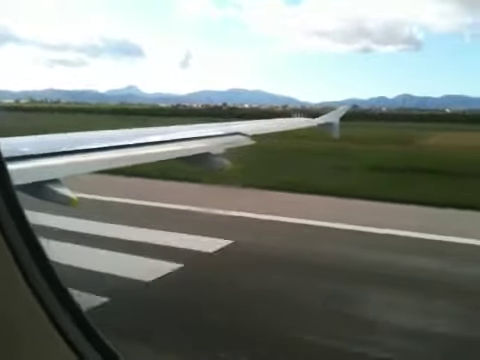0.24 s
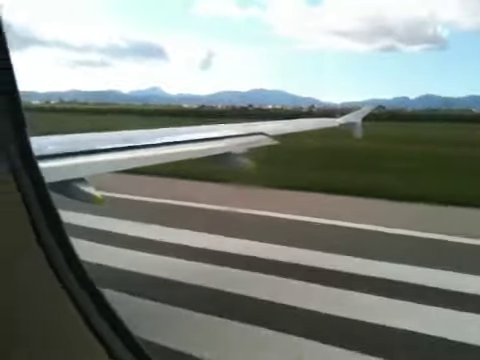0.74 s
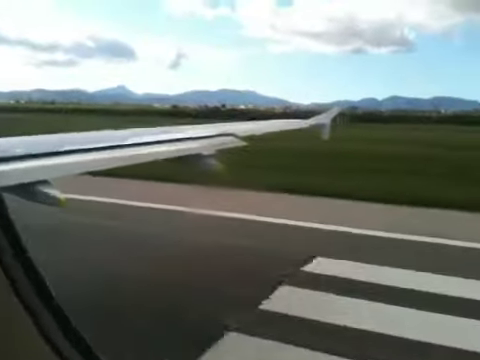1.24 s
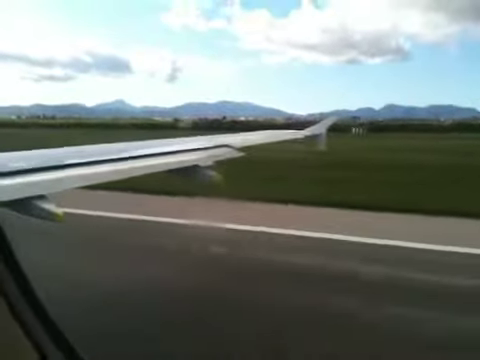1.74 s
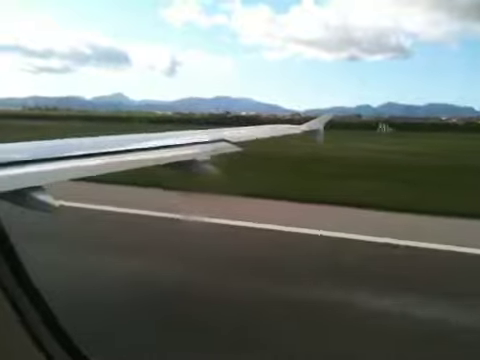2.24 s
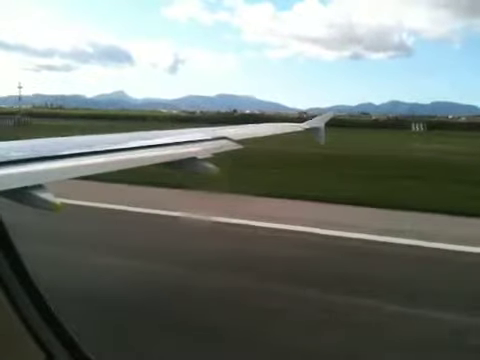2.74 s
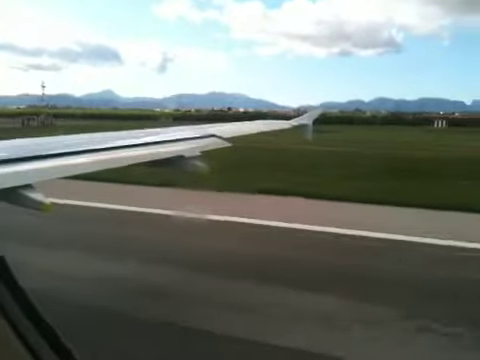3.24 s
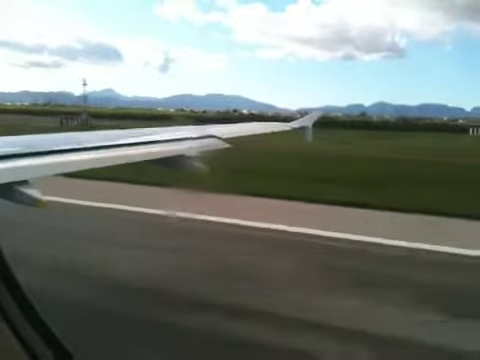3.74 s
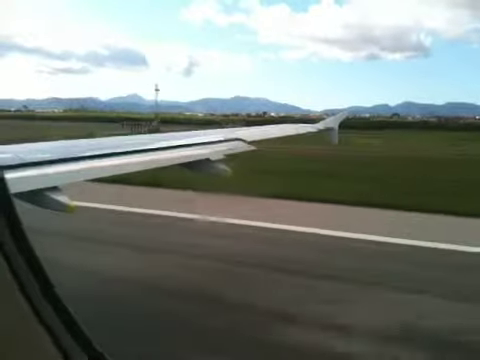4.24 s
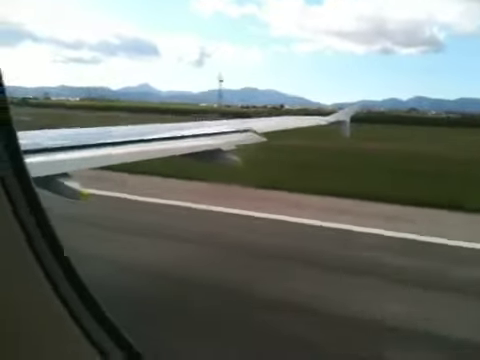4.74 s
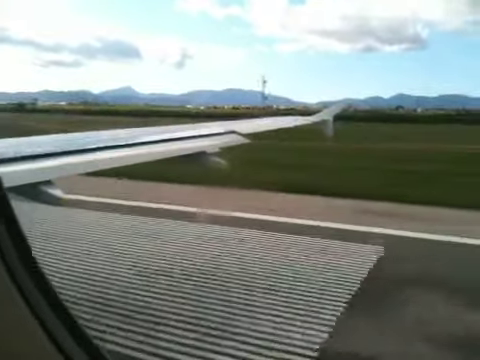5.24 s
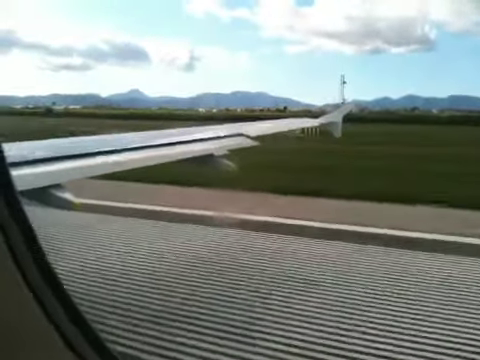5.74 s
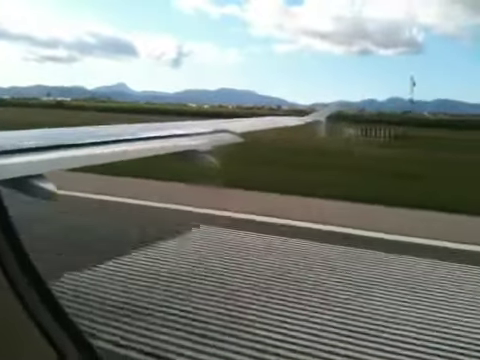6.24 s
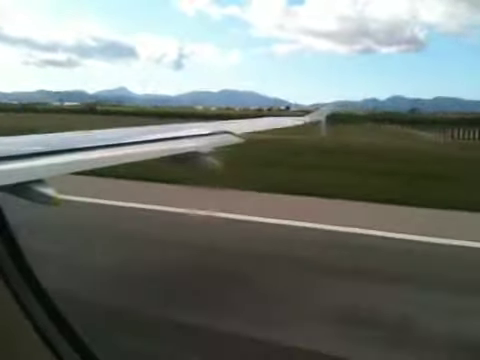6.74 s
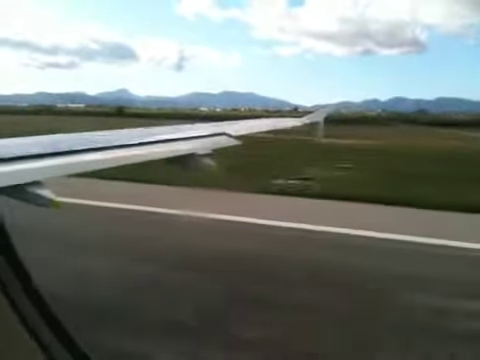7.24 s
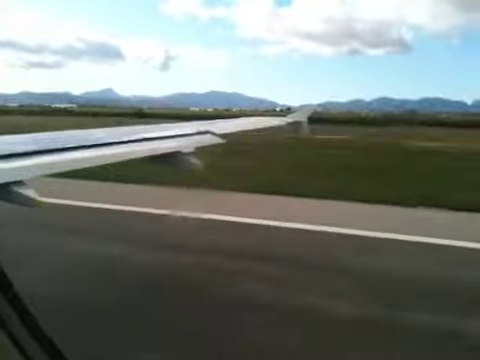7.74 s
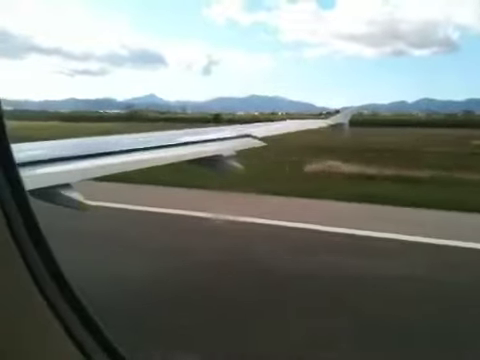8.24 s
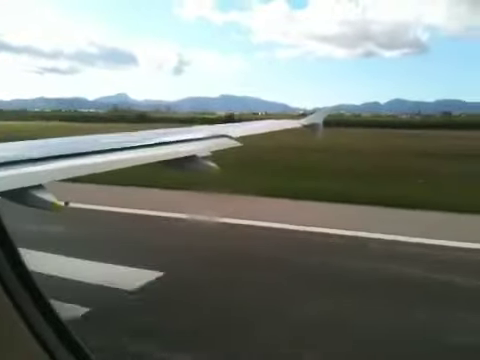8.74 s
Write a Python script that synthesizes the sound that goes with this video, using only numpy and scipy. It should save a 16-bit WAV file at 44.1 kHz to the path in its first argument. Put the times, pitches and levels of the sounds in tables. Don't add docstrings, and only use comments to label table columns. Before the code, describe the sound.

Inside an airliner rolling fast along a runway, booming engine roar, hissing vents, buzzing plastic panels, hard rattling knocks and floor thumps.

```python
import sys
import numpy as np
from scipy import signal
from scipy.fft import rfft, irfft
from scipy.io import wavfile
from scipy.ndimage import uniform_filter1d

SR = 44100
rng = np.random.default_rng(int(sys.argv[2]) if len(sys.argv) > 2 else 0)


def makeup_ratio(level_db):
    decades = np.asarray(level_db, float) / 20
    return 10 ** decades


def waveform_to_disk(signal):
    frames = np.transpose(np.atleast_2d(signal))
    scaled = np.clip(frames, -1, 1) * 32767
    samples = np.round(scaled).astype(np.int16)
    wavfile.write(sys.argv[1], SR, samples)


N = 396459

# time in seconds, rise in dB.
JOLTS = [(.0, 27), (.22, -12), (.55, 5), (.75, 4), (.87, 13), (.93, -1), (1.4, 6), (1.52, -2), (2.13, 10),
         (2.23, 15), (2.56, 4), (2.75, 9.5), (3.03, 7), (3.27, 13), (3.52, 8), (3.82, 3), (4.3, 3),
         (4.62, 2), (4.78, 11), (5.01, 2), (5.2, -8), (5.56, -3), (6.4, 0), (7.08, 3), (7.28, 16),
         (7.96, 11), (8.34, 8), (8.64, 8), (8.84, 8)]
JOLT_S = 0.025


def evened(x):
    return x / np.sqrt(np.mean(x ** 2) + 1e-20)


def smooth_twice(x, size):
    return uniform_filter1d(uniform_filter1d(x, size=size), size=size)


def curve(rows):
    s, db = np.transpose(rows)
    return np.interp(np.arange(N) / SR, s, db)


def swell(rows, width_s, late_s=0):
    t = np.arange(0, N + 64, 64) / SR
    s, db = np.transpose(rows)
    bells = db @ np.exp(-((t - s[:, None] - late_s) / width_s) ** 2)
    return np.interp(np.arange(N) / SR, t, bells)


def resonate(x, hz, width):
    r = np.exp(-np.pi * width / SR)
    return 2 * signal.lfilter([1 - r], [1, -r * np.exp(2j * np.pi * hz / SR)], x).real


def swings(rows, t60, rise_s):
    t, out = np.arange(2400) / SR, np.zeros(N + 2400)
    for s, db, hz in rows:
        envelope = makeup_ratio(db - 60 * t / t60) * (1 - np.exp(-t / rise_s))
        start = round(s * SR)
        out[start:start + len(t)] += envelope * np.sin(2 * np.pi * hz * t)
    return out[:N]


def swishes(rows, width):
    t, noise, out = np.arange(N) / SR, rng.standard_normal(N), 0
    for s, length, db, hz in rows:
        swish = evened(resonate(resonate(noise, hz, width), hz, width))
        out = out + makeup_ratio(db) * np.exp(-(2 * (t - s) / length) ** 2) * swish
    return out


def turbulence(points, size, patchy_db, flicker_db):
    hop = size // 4
    hz = np.fft.rfftfreq(size, 1 / SR)
    a, b, patches = rng.standard_normal((3, len(hz), N // hop + 8))
    patches = uniform_filter1d(patches, size=8, axis=0)
    patches = evened(uniform_filter1d(patches, size=10, axis=1))
    flicker = evened(uniform_filter1d(rng.standard_normal(a.shape[1]), size=3))
    f, db = np.transpose(points)
    colour_db = np.interp(np.log(hz + 1), np.log(f + 1), db, right=-150)[:, None]
    z = (a + 1j * b) * makeup_ratio(colour_db + patchy_db * patches + flicker_db * flicker)
    return evened(signal.istft(z, nperseg=size, noverlap=size - hop)[1][size:N + size])


def whine(waver_hz=2.):
    # pitch in Hz, level in dB.
    overtones = [(11946, -79.5), (12743, -75), (13540, -85), (15030, -91), (15133, -90)]
    waver = evened(uniform_filter1d(rng.standard_normal(N), size=6000)) * waver_hz / 12000
    t = np.cumsum(1 + waver) / SR
    tones = 0
    for hz, db in overtones:
        tones = tones + np.sqrt(2) * makeup_ratio(db) * np.sin(2 * np.pi * (hz * t + rng.random()))
    return tones


def vent(hz=2250, width=550, level_db=-50, swell_db=1.5):
    noise, drift = rng.standard_normal((2, N))
    drift = evened(smooth_twice(drift, 4000))
    breath = evened(resonate(resonate(noise, hz, width), hz, width))
    return makeup_ratio(level_db + swell_db * drift) * breath


def air(start_db=-31.5, sag_db_per_s=-0.1843, per_jolt=0.14):
    # pitch in Hz, level in dB per Hz.
    hiss = [(410, -21.5), (700, 0), (1130, -8), (1310, -7), (1430, -11), (1880, -14), (2220, -13.5),
            (2500, -19), (3030, -19.5), (3880, -20.5), (4250, -23.5), (7630, -26.5), (10400, -33),
            (13200, -40), (15600, -53)]
    level_db = start_db + sag_db_per_s * np.arange(N) / SR + per_jolt * swell(JOLTS, JOLT_S)
    return makeup_ratio(level_db) * turbulence(hiss, size=512, patchy_db=0.7, flicker_db=0.79)


def cloth():
    # centre in seconds, length in seconds, level in dB, pitch in Hz.
    brushes = [(4.275, 0.15, -50, 9900), (4.6, 0.12, -48, 8000), (5.68, 0.072, -46, 8160),
               (6.9, .03, -62, 12500), (4.26, .14, -62, 11500), (4.35, .12, -59, 9000),
               (4.95, .1, -60, 10000)]
    # centre in seconds, length in seconds, level in dB, pitch in Hz.
    rustles = [(3.275, .07, -44, 2700), (3.27, .06, -52, 13000), (2.17, .12, -60, 13500),
               (2.56, .1, -60, 13500), (.78, .08, -60, 13500), (3.82, .04, -60, 13500)]
    return swishes(brushes + rustles, width=3000)


def latch():
    # centre in seconds, length in seconds, level in dB, pitch in Hz.
    scuffs = [(5.508, .012, -38, 2400), (5.524, .012, -39, 2500), (5.535, 0.018, -40, 2400),
              (5.548, .012, -40, 2300), (6.2, .012, -34, 1600), (0.7, .012, -36, 1700),
              (.8595, .004, -31, 5400), (7.72, .04, -42, 2130)]
    # start in seconds, peak in dB, pitch in Hz.
    pings = [
        (.863, -28, 1720),
        (5.595, -31, 1550),
    ]
    return swishes(scuffs, width=540) + swings(pings, t60=0.057, rise_s=.0003)


def panel(taps, dull=1, bright=1):
    # pitch in Hz, width in Hz, level in dB.
    modes = [(1660, 210, 7), (2120, 410, -10), (3570, 630, -12), (5650, 1100, 0), (6700, 340, 7),
             (7430, 1600, 3.5), (9400, 3200, -26), (11900, 470, -20), (13400, 900, -25), (15300, 900, -24)]

    def ring(x, rows):
        return sum(makeup_ratio(db) * resonate(x, hz, width) for hz, width, db in rows)

    low, mid, high = ring(taps * dull, modes[:3]), ring(taps, modes[3:7]), ring(taps * bright, modes[7:])
    return low - mid + high


def buzz(per_s=260, spread_db=3.5, t60=0.0071):
    start_db, sag_db_per_s, per_jolt = -53.5, -.5, .2
    size = makeup_ratio(spread_db * np.minimum(rng.exponential(1, N), 2.6))
    size = size * (rng.random(N) < per_s / SR)
    fade = makeup_ratio(-60 * np.arange(2000) / SR / t60)
    chatter = signal.oaconvolve(size, fade)[:N] * rng.standard_normal(N)
    shake_db = start_db + sag_db_per_s * np.arange(N) / SR + per_jolt * swell(JOLTS, JOLT_S)
    return makeup_ratio(shake_db) * evened(panel(chatter))


def knocks(t60=0.0105, bounce_s=0.0036, bounce_db=-11):
    # start in seconds, peak in dB, dull part in dB.
    clear = [(0.0418, -25, -4), (0.0777, -21, -6), (0.1476, -33, -4), (0.17, -34, -6), (0.2414, -32, -6),
             (0.2798, -34, -4), (0.3077, -26, -6), (0.3716, -30, -4), (0.3885, -27, 1), (0.4614, -39, -4),
             (0.5252, -35, -4), (0.5367, -27, -4), (0.5462, -25, -4), (0.5656, -27.5, 0), (0.618, -33, -4),
             (0.6365, -33, -4), (0.6804, -38, -4), (0.7158, -35, -4), (0.7357, -32, -4), (0.7537, -22, -4),
             (0.8126, -28, -4), (0.8135, -25, -1), (0.858, -19, 0), (0.8849, -31, -4), (0.9147, -24, -2),
             (0.9443, -31, -8), (0.9607, -27, -12), (0.9737, -24.5, -5), (0.9986, -32, -4),
             (1.034, -28, -2), (1.0515, -30, -8), (1.0954, -34, -4), (1.1194, -31, -4),
             (1.1326, -23.5, -1.5), (1.1777, -34, -2), (1.2825, -32, -4), (1.3249, -27, -4),
             (1.4022, -29, -6), (1.4701, -32, -12), (1.719, -35, -8), (1.7739, -36, -4), (1.9919, -35, -4),
             (1.9918, -36, -4), (2.0562, -24, -5), (2.1081, -32, -4), (2.1273, -24.5, -7),
              (2.1949, -28, -4), (2.2146, -25.5, -4), (2.382, -33, -4), (2.4698, -35, -6),
              (2.5042, -29, -6), (2.5235, -26, -10), (2.5406, -31, -4), (2.579, -32, -11), (2.599, -26, -4),
              (2.7302, -31, -4), (2.7501, -28, -6), (2.785, -32, -4), (2.8599, -35, -4), (2.9018, -32, -4),
              (3.017, -29, -8), (3.028, -27, -4), (3.2146, -34, -4), (3.2315, -30, -6), (3.2555, -23.5, -6),
              (3.2642, -26, -6), (3.283, -23, -6), (3.3158, -26, -4), (3.3543, -30, -4), (3.37, -28, -4),
              (3.4431, -36, -4), (3.4605, -28.5, -7), (3.5007, -27, -4), (3.5363, -32, -10),
              (3.6172, -31, -4), (3.7119, -35, -4), (3.777, -28, -2), (3.816, -23.5, -1.5),
              (3.8716, -31, -4), (3.9743, -33, -4),
             (4.0258, -32, -4), (4.129, -28, 1), (4.2428, -30, -8), (4.2777, -29, -4), (4.3341, -32, -4),
             (4.4937, -28, -4), (4.494, -23, -4), (4.5331, -29, -4), (4.6184, -30, -4), (4.6294, -26, -4),
             (4.6858, -37, -4), (4.7437, -29, -4), (4.7586, -33, -4), (4.7751, -27.5, -4),
             (4.8634, -35, -4), (4.9162, -29, -4), (4.9507, -28, -4), (5.0978, -34, -2), (5.1338, -35, -4),
             (5.1712, -29, 0), (5.1886, -29, -2), (5.1976, -29, -4), (5.228, -29, 0), (5.2854, -31, -4),
             (5.3143, -28, -4), (5.391, -26.5, -14), (5.5373, -34, -4), (5.5548, -30, -4),
             (5.5938, -25, -4), (5.6311, -32, -4), (5.7219, -28.5, -2), (5.7793, -36, -4),
             (5.8661, -35, -4), (5.9788, -30, -2),
             (6.0492, -37, -4), (6.1245, -31, -1), (6.1465, -33, -4), (6.1774, -32, -4), (6.261, -26, -6),
            (6.3445, -30, -4), (6.4059, -32, -4), (6.4139, -30, -4), (6.4428, -29, -4), (6.5102, -33, -4),
            (6.5456, -28.5, -4), (6.8339, -31, -8), (6.8878, -35, -4), (6.9056, -26, -7), (6.9621, -28, -4),
            (7.0006, -35, -4), (7.0395, -32, -4), (7.0574, -26, -9), (7.0904, -31, -4), (7.1153, -31, -4),
            (7.1487, -29.5, -4), (7.1826, -31, -4), (7.2156, -25, -4), (7.2625, -34, -4), (7.2779, -26, -4),
            (7.3388, -35, -4), (7.3712, -29, -4), (7.3802, -27, -4), (7.472, -34, -4), (7.4959, -34, -4),
            (7.8147, -29, -4), (7.8511, -36, -4), (7.9534, -29, -2), (8.0537, -31.5, -4), (8.1998, -34, -4),
            (8.2253, -32, 1), (8.2597, -27.5, -4), (8.316, -29, -4), (8.3455, -30, -4), (8.4163, -35, -4),
            (8.4428, -32, -4), (8.4842, -34, -4), (8.5331, -32, -6), (8.6004, -36, -4), (8.6413, -30, -4),
            (8.6753, -31, -4), (8.806, -31, -4), (8.8379, -30, -4), (8.8723, -32, -4), (8.9746, -31, 2)]
    close_hits = [(0.0788, -22, 0), (.8592, -23.5, 0), (0.8622, -22, 2)]
    more_knocks = [(1.8, -29, -6), (2.2315, -29, -6), (2.5895, -29, -6), (3, -31, -6), (3.2735, -30, -8),
                   (3.307, -32, -1), (5.591, -28, -8), (5.579, -35, -2), (.8285, -29, -4), (.839, -30, -2.5),
                   (0.06, -31, -6)]
    rows = clear
    following = rows[1:] + [(99,)]
    rows = [row for row, then in zip(rows, following) if then[0] - row[0] > .003]
    rows = rows + close_hits + more_knocks

    t = np.arange(1500) / SR
    blow = makeup_ratio(-60 * t / t60) * np.minimum(t / 0.00056, 1)
    blow = blow + makeup_ratio(bounce_db) * np.interp(t - bounce_s, t, blow, left=0)
    stick_slip = rng.choice([-1., 1.], (len(rows), len(t)))
    snap = np.arange(len(t)) == round(.0006 * SR)
    grit = .6 * stick_slip + makeup_ratio(8.5) * snap

    taps, dull, bright = np.zeros(N + len(t)), np.ones(N + len(t)), np.ones(N + len(t))
    for (s, db, dull_db), g in zip(rows, grit):
        at = slice(round(s * SR), round(s * SR) + len(t))
        taps[at] += makeup_ratio(1.3 * (db + 24.0) - 19.5) * blow * g
        dull[at] = makeup_ratio(dull_db + 12.5)
        bright[at] = makeup_ratio(-7)
    crack = makeup_ratio(1) * resonate(taps * bright, hz=8500, width=9000)
    return (panel(taps, dull, bright) + crack)[:N]


def bumps():
    # start in seconds, peak in dB, pitch in Hz.
    floor = [(0.306, -4, 574), (0.493, -33, 678), (0.849, -4, 470), (1.075, -14, 640), (1.171, -1, 520),
             (1.25, -19, 466), (1.596, -3.5, 560), (1.618, -16, 506), (1.661, -19, 490), (1.88, -20, 463),
             (1.949, -9, 516), (2.896, -2.5, 633), (2.944, -12, 540), (3.021, -7, 555), (3.076, -25, 471),
             (3.107, -29, 606), (3.365, 1.5, 516), (3.641, 1.5, 547), (3.693, -6, 630), (3.721, -13, 589),
             (4.149, -30, 473), (5.064, -13, 535), (5.458, -10, 527), (6.446, -26, 452), (6.771, -0.5, 520),
             (6.813, -11, 450), (7.085, -12, 515), (7.612, -7, 514), (7.785, -5, 510), (8.638, -6, 500)]
    thuds = [(s, db, 0.442 * hz) for s, db, hz in floor]
    return makeup_ratio(-4) * (swings(floor, t60=0.032, rise_s=.002) + swings(thuds, t60=.06, rise_s=.002))


def roar(steadiness=0.089):
    # time in seconds, roar level in dB.
    thrust = [(0, -5), (.1, -16), (.2, -11.5), (3.5, -12), (5, -12.5), (8.99, -12.5)]
    # pitch in Hz, level in dB per Hz.
    exhaust = [(12, 3.5), (25, 2), (55, -5.5), (90, -6.5), (130, -2), (210, -1.5), (290, -4.5), (390, -11),
               (500, -12.5), (590, -19), (1200, -46), (1560, -67), (2640, -120)]
    # pitch in Hz, width in Hz, level in dB.
    modes = [(209.2, 23, -12), (147, 59, -12.5), (265, 12, -23.5), (236.4, 8.8, -21), (287.7, 50, -20.5)]
    # time in seconds, rise in dB.
    gusts = [(0, 3), (.15, 9.5), (1.25, 9.5), (2.2, 5), (2.6, 4), (3.38, 6.5), (4.63, 5), (5.66, 3.5),
             (6.19, 7), (6.46, 10.5), (6.96, 1), (7.68, 4.5), (8.34, 4), (8.81, 5)]
    wall = turbulence(exhaust, size=4096, patchy_db=-1.1, flicker_db=0.4)
    boom = sum(makeup_ratio(db) * evened(resonate(wall, hz, width)) for hz, width, db in modes)
    surge = smooth_twice(boom ** 2, 2000)
    steadied = evened((wall + boom) / surge ** (steadiness / 4))
    gust_s, lull_s, lull_share = 0.029, 0.013, 0.57
    gusts_db = swell(gusts, gust_s) - lull_share * swell(gusts, gust_s, late_s=lull_s)
    return makeup_ratio(curve(thrust) + gusts_db + 1.5) * steadied


def scene():
    background = vent() + air() + cloth() + latch()
    return (background + buzz() + knocks() + bumps() + roar())[None]


def round_off(x, ceiling, knee):
    return x / (1 + abs(x / ceiling) ** knee) ** (1 / knee)


def port(x):
    # pitch in Hz, width in Hz, depth in dB.
    dips = [(12500, 900, -3.5), (14250, 500, -1.5), (11400, 300, -2), (15250, 200, -1), (4250, 300, -2)]
    hz = np.fft.rfftfreq(N, 1 / SR)
    dips_db = sum(db * np.exp(-((hz - f) / width * 2) ** 2) for f, width, db in dips)
    return irfft(rfft(x) * makeup_ratio(dips_db) * (hz < 15850), N)


def thin_out(x):
    # pitch in Hz, level in dB over its surroundings.
    spared = [(7000, -8), (10500, -4), (12000, -1.2), (14000, -.8), (15800, -.3)]
    hz, _, z = signal.stft(x, SR, nperseg=2048)
    patch = uniform_filter1d(uniform_filter1d(abs(z) ** 2, size=7, axis=1), size=2, axis=2)
    usual = uniform_filter1d(np.median(patch, axis=2, keepdims=True), size=50, axis=1)
    nearby = uniform_filter1d(patch, size=50, axis=1)
    f, db = np.transpose(spared)
    least = makeup_ratio(2 * np.interp(hz, f, db, left=-99))[:, None]
    kept = patch > usual ** .25 * nearby ** .75 * least
    return signal.istft(z * kept, SR, nperseg=2048)[1][:, :N]


def starve(x):
    # start in seconds, end in seconds, lowest lost pitch in Hz.
    starved = [(.061, .068, 6800), (.068, .073, 13000), (.092, .099, 14500), (.293, .303, 11500),
               (.846, .851, 12800), (.851, .855, 10000), (.866, .870, 11000), (.874, .880, 12300),
               (1.122, 1.128, 11500), (1.139, 1.146, 10500)]
    hz, t, z = signal.stft(x, SR, nperseg=128)
    lost = sum((t > start) * (t < end) * (hz > low_hz)[:, None] for start, end, low_hz in starved)
    return signal.istft(z * (lost == 0), SR, nperseg=128)[1][:, :N]


def low_pass(x):
    return signal.sosfilt(signal.butter(12, 15720, fs=SR, output="sos"), x)


def record(dry, cut_hz=112):
    clipped = round_off(dry, ceiling=.6, knee=8)
    cut = signal.sosfilt(signal.butter(4, cut_hz, "high", fs=SR, output="sos"), clipped)
    wired = round_off(port(cut) + whine(), ceiling=.712, knee=14)
    return low_pass(starve(thin_out(wired)))


dry = scene()
out = record(dry)
waveform_to_disk(out)
```